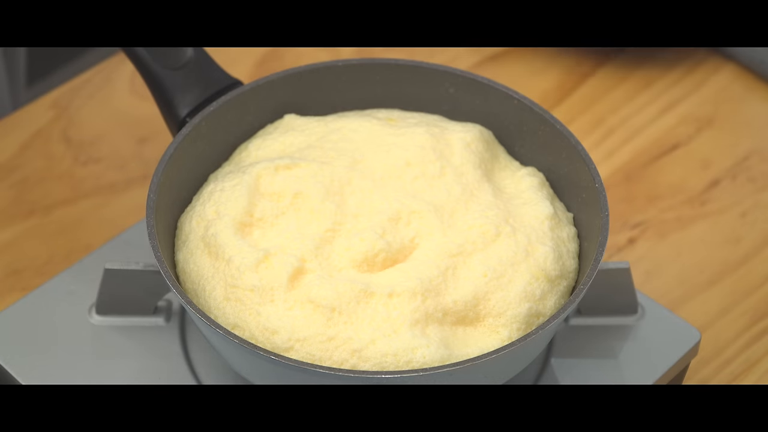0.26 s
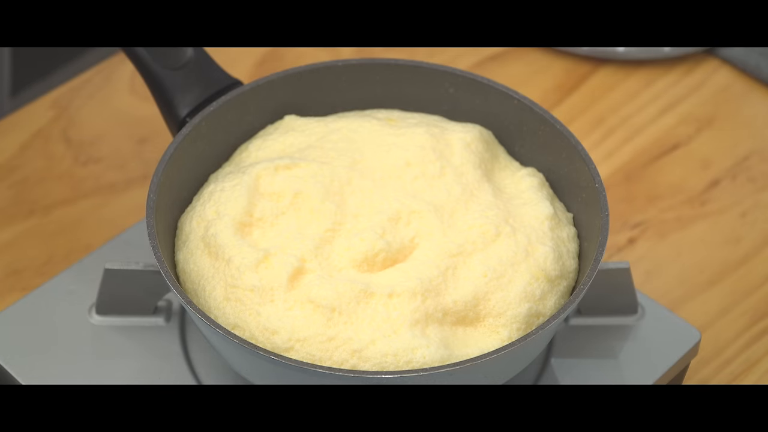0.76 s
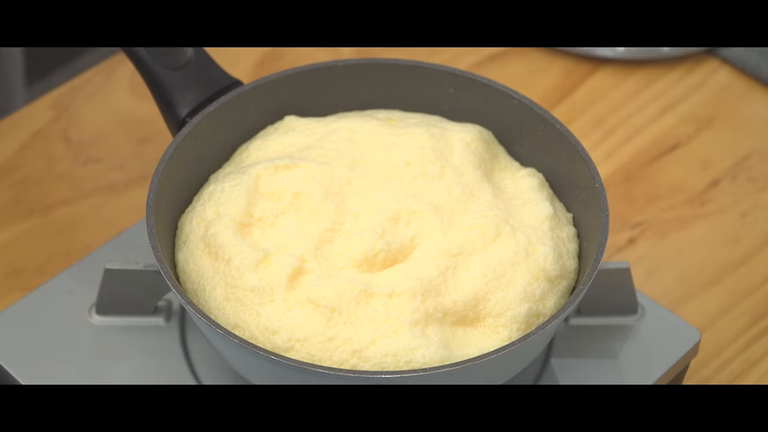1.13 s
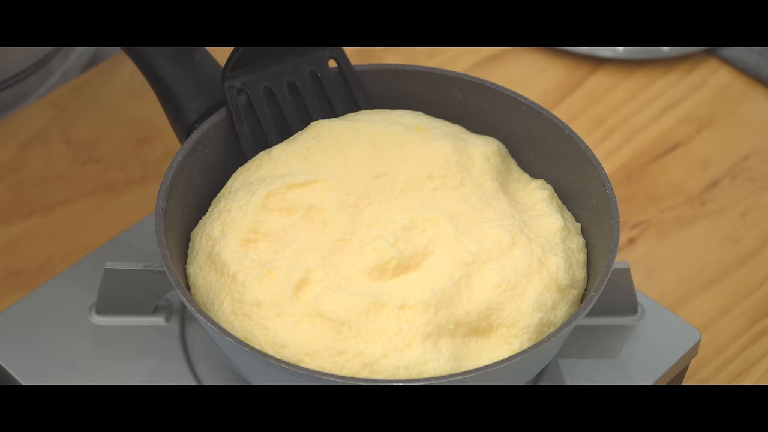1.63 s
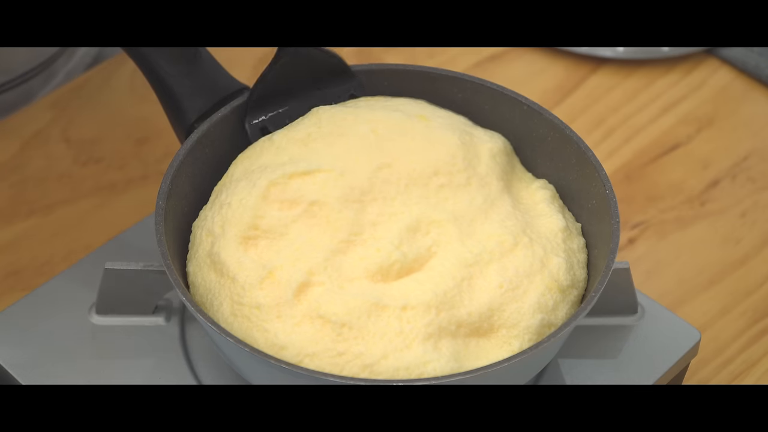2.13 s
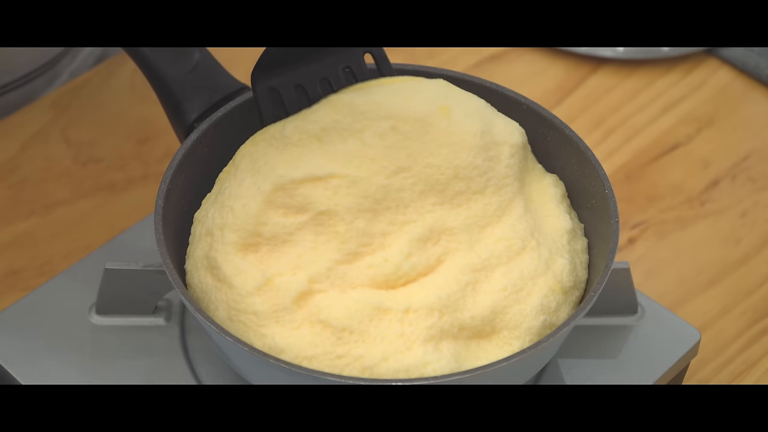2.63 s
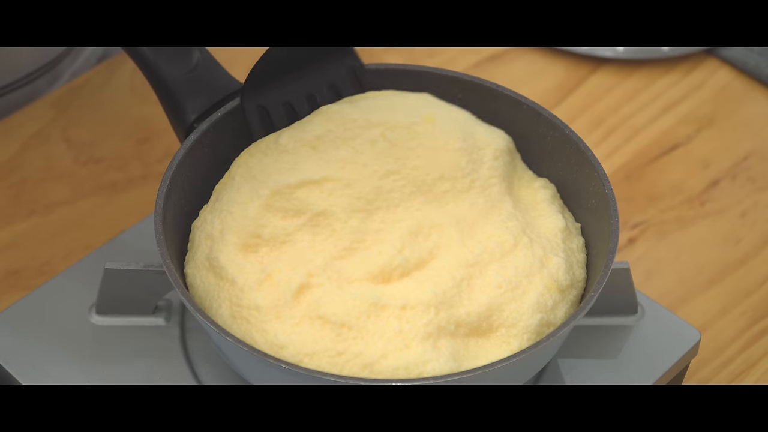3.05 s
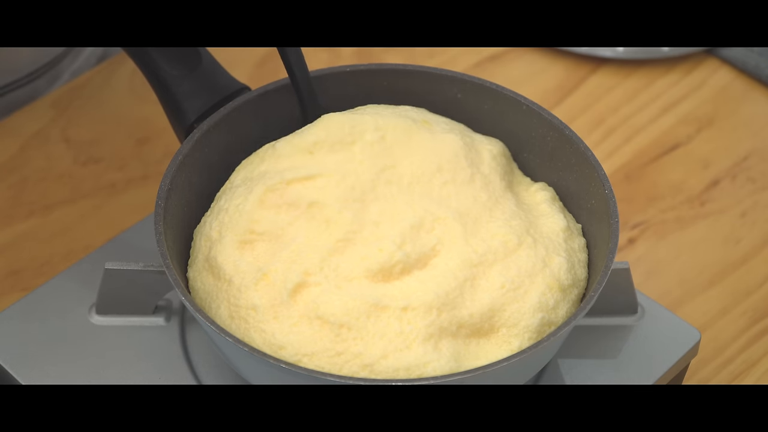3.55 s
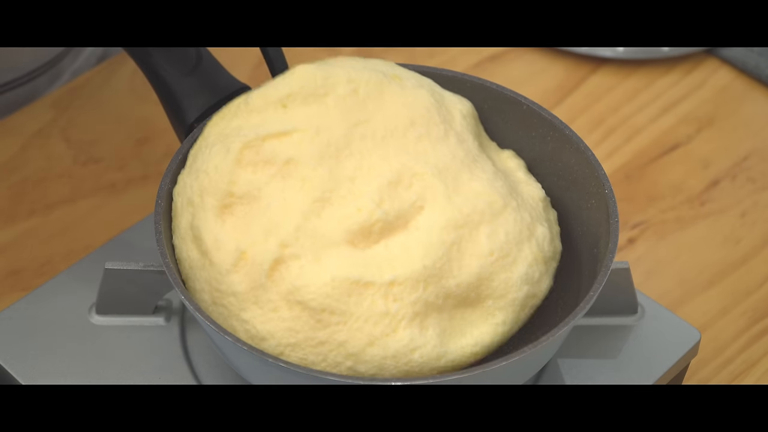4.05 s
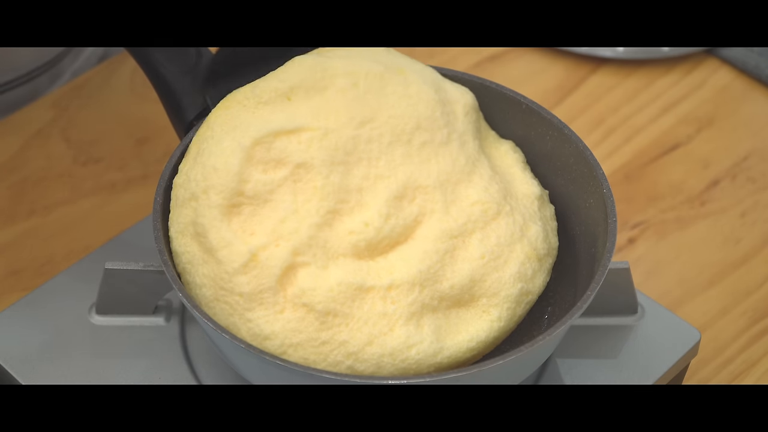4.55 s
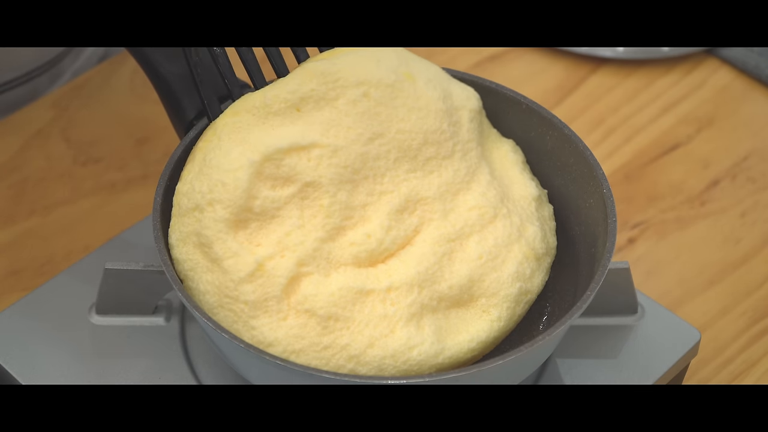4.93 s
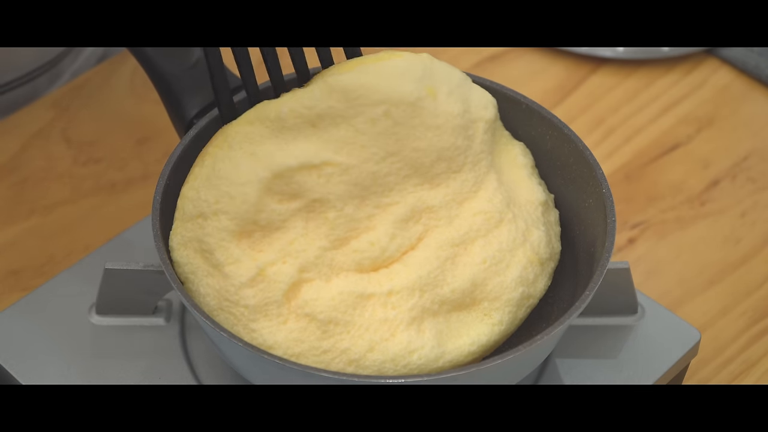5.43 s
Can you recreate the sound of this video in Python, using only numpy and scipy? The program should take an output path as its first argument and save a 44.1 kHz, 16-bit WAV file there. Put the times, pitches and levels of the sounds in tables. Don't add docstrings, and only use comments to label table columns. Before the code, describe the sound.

Quiet kitchen hum and cricket chirps; one ringing dish clank, then dull pan knocks, soft scraping and crackling as egg crust lets go.

```python
import sys
import numpy as np
from scipy import signal
from scipy.fft import rfft, irfft
from scipy.io import wavfile
from scipy.ndimage import uniform_filter1d

SR = 44100
rng = np.random.default_rng(int(sys.argv[2]) if len(sys.argv) > 2 else 0)


def to_wav(s):
    ch = np.atleast_2d(s).T
    pcm = np.round(np.clip(ch, -1, 1) * 32767)
    wavfile.write(sys.argv[1], SR, pcm.astype(np.int16))


def ratio_of_db(decibels):
    return 10 ** (np.asarray(decibels, float) / 20)


N = 251037

# pitch_hz, density_db (per Hz)
HISS_SPECTRUM = [(25, -28.5), (55, -9), (110, -5.5), (370, -18), (1500, -23), (2500, -23.5), (4000, -25),
                 (4600, -26.5), (5500, -19), (6300, -34.5), (11000, -35), (16000, -39)]
# pitch_hz, width_hz, level_db
FAN_RESONANCES = [(1900, 33, -78), (2534, 220, -70.5), (3120, 62, -76.5), (3294, 110, -72.5),
                  (3930, 230, -73), (9000, 130, -99), (11530, 104, -83.5), (12530, 150, -83.5),
                  (13200, 110, -82)]
# time_s, pitch_hz, level_db
MAINS_HUM = [(0, 101.1, -61.5), (.56, 101, -60), (.62, 100.6, -66), (.94, 100.5, -56), (.98, 99.8, -62.5),
             (1.32, 99.7, -64.5), (1.36, 100, -50.5), (2.5, 100.4, -54), (3.5, 95.2, -58.5),
             (4.5, 97.6, -63.5), (5.69, 99.2, -71.5)]
# start_s, length_s
CHIRPS = [(-.12, 0.15), (0.138, 0.15), (0.433, 0.14), (0.706, 0.15), (0.987, 0.23), (1.227, 0.22),
          (1.484, 0.17), (1.74, .15), (2.056, 0.14), (2.331, 0.14), (2.633, 0.16), (2.9, 0.19),
          (3.162, .15), (3.41, .14), (3.714, .14), (3.999, .15), (4.283, 0.15), (4.57, 0.19), (4.892, 0.1),
          (5.145, .12), (5.426, .11), (5.684, .1)]
# time_s, peak_db
DISH_BLOWS = [
    (0.6857, -22.5),
    (.7122, -24.5),
    (0.7167, -37.5),
    (0.7257, -29.5),
    (0.7334, -34.5),
]
# pitch_hz, level_db, t60_s
DISH_MODES = [(78, -14.5, 0.37), (181, -11, 0.28), (292, -13, 0.13), (417, -15, 0.37), (531.5, -7, 0.27),
              (556, -15, .2), (625, -7, 0.44), (733, -21.5, 0.52), (794, -8.5, 0.25), (890, -13, .2),
              (1023, -11, 0.59), (1042, -27, 0.39), (1300, -13, .2), (1417, -17, 0.52), (1450, -3.5, 0.1),
              (1780, -25, 0.25), (1762, -13, 0.5), (1810, -33, 0.47), (2020, -10, 0.19), (2268, -18, 0.55),
              (2565, -28, 0.26), (2844, -19, 0.55), (3400, -31, .3), (4370, -31.5, 0.27), (4760, -37, 0.18),
              (6430, -32, 0.09), (6540, -36, 0.33), (7500, -31.5, 0.1)]
# pitch_hz, level_db, t60_s
TABLE_MODES = [(593, 6, 0.038), (863, 6.5, 0.023), (1322, 7.5, 0.048), (1745, 14.5, 0.025),
               (2290, 2.5, 0.023), (3900, -15.5, 0.028)]
# time_s, gain_db
CLANK_DIP = [(0, 0.5), (.575, -0.5), (.6, -9), (.951, -8), (.957, -0.5), (6, 0)]
# time_s, sway_db, rumble_db
SHOVES = [(.69, -47, -94.5), (1.33, -40.5, -60.5), (1.7, -46.5, -53), (1.94, -43, -52), (2.1, -50.5, -49.5),
          (3.17, -50, -53), (3.3, -49, -51), (3.43, -51.5, -48.5), (4.15, -61, -55), (4.35, -52.5, -54.5),
          (5.2, -77, -69)]
# start_s, hold_s, scrape_db, crackle_db
BLADE_STROKES = [(1.353, 0.039, -57, -71), (1.84, 0.28, -60.5, -88), (2.115, 0.18, -60, -73),
                 (2.43, 0.041, -61, -62.5), (2.548, 0.4, -63.5, -65), (3.164, 0.037, -74, -61),
                 (3.29, 0.029, -53, -76), (3.376, 0.077, -52, -49), (3.493, 0.059, -63, -48),
                 (3.551, 0.026, -59.5, -57), (3.68, 0.051, -59, -51.5), (3.728, .11, -70, -60),
                 (3.88, 0.049, -56, -61.5), (3.99, .13, -67, -64.5), (4.175, 0.041, -60, -80),
                 (4.55, .03, -61, -66), (5.071, 0.039, -67, -64), (5.58, 0.13, -68, -69)]
# pitch_hz, density_db (per Hz)
SCRAPE_SPECTRUM = [(500, 6), (1000, 7.5), (2000, 6), (3200, 0.5), (6000, -9)]
KNOCK_EDGES_HZ = [120, 550, 1500, 2900, 6000, 12000]
# time_s, thump_db, 1khz_db, 2khz_db, 4khz_db
RIM_TAP = [
    (1.3285, -27.5, -32, -29, -31),
]
# time_s, thump_db, 1khz_db, 2khz_db, 4khz_db
PAN_KNOCKS = [(1.679, -41, -49, -49, -72), (1.696, -32.5, -25.5, -30, -28), (1.731, -39, -43.5, -48, -68),
              (1.826, -44, -41, -47.5, -49.5), (1.937, -27.5, -28.5, -29.5, -29),
              (2.090, -28.5, -24, -25.5, -30.5), (2.21, -51, -51, -62, -65), (2.487, -50.5, -54, -59, -54),
              (3.2698, -25, -22.5, -22, -29.5), (3.368, -58, -42, -59, -45), (3.488, -50, -44, -43.5, -57),
              (3.670, -61, -49, -42.5, -47), (3.955, -68, -68, -54, -45.5), (3.868, -45, -49, -51, -56),
              (5.063, -67, -52, -55, -54), (5.102, -56, -50, -49.5, -47)]
# time_s, thump_db, 1khz_db, 2khz_db, 4khz_db
FLOOR_THUDS = [
    (3.066, -43.5, -70, -49.5, -60),
    (3.1632, -19, -26, -29.5, -43.5),
    (4.06, -43, -63, -53, -53),
    (4.267, -45.5, -71, -71, -70),
    (4.339, -13.5, -28.5, -19.5, -37),
    (4.4168, -19.5, -33, -50, -45.5),
    (5.19, -49.5, -64, -68, -68),
]
# pitch_hz, level_db (within its band), t60_s
RIM_MODES = [(139.5, -6, 0.13), (424.5, -24, 0.14), (785, 0.5, 0.09), (890, -6, 0.071), (1360, 9.5, 0.022),
             (1873, 3, 0.027), (2130, -13, 0.05), (2690, -10.5, 0.11), (3330, 6.5, 0.0096),
             (3640, -10, 0.069), (3470, -14, 0.18), (4640, -6, 0.073), (6230, 2, .04)]
# pitch_hz, level_db (within its band), t60_s
PAN_MODES = [(159.4, 1, 0.061), (230, 3, 0.038), (357, -0.5, 0.11), (418, -3.5, 0.079), (790, -14, 0.083),
             (1050, -11.5, 0.15), (1422, 7.5, 0.013), (1890, -1, 0.03), (1970, -13.5, 0.046),
             (2053, -5, 0.071), (2460, -1.5, 0.044), (3170, -8.5, 0.058), (3800, -2, 0.021),
             (4590, -5, 0.076), (5070, -3, 0.019), (5610, 0.5, 0.042), (7030, 3, 0.0096), (8000, 0, 0.012),
             (8430, -2.5, 0.011), (8494, -1, 0.043)]
# pitch_hz, level_db (within its band), t60_s
FLOOR_MODES = [(139, -8.5, 0.031), (264, 0.5, 0.039), (817, -4, 0.033), (1034, -10, 0.23),
               (1050, -11.5, 0.13), (1104, -10.5, 0.1), (1420, 0.5, 0.02), (1943, -0.5, 0.029),
               (2220, -25, 0.027), (3060, -2, 0.023), (4040, -1, 0.047), (5140, -10, 0.036),
               (8500, -2, .03)]
# time_s, peak_db
SINGLE_POPS = [(1.398, -43), (1.536, -43), (2.2605, -24), (2.3566, -38), (2.3858, -40), (2.43, -38),
               (2.4497, -31.5), (2.5675, -39.5), (2.9754, -44), (3.184, -25.5), (3.305, -38), (3.4508, -42),
               (3.5938, -32), (3.6294, -42), (3.7505, -26), (3.7637, -32), (3.8214, -29.5), (3.838, -28.5),
               (4.121, -39), (4.295, -41), (4.3636, -36), (4.458, -40), (4.8683, -38), (4.91, -35.5),
               (5.1031, -32.5), (5.165, -37.5), (5.3071, -42), (5.368, -40.5), (5.4488, -40), (5.649, -35)]
# start_s, length_s, mean_gap_s, strongest_db
TEARS = [(2.275, .008, 0.0047, -34), (2.7003, .025, .01, -38), (2.784, 0.085, 0.013, -36.5),
         (2.888, 0.067, .012, -36), (3.2087, .012, 0.0043, -27.5), (3.3826, 0.008, 0.0016, -21),
         (3.3966, 0.0026, 0.0013, -21.5), (3.4026, .028, .0045, -25), (3.492, .014, .003, -32),
         (3.507, .025, .0025, -24.5), (3.545, 0.042, .0035, -37), (3.6705, 0.035, 0.0036, -26),
         (3.7144, .017, .004, -29), (3.902, .07, 0.013, -49), (3.433, 0.045, .006, -44),
         (3.765, .012, 0.0034, -38), (2.451, .05, 0.019, -43), (3.197, .01, 0.0036, -47),
         (3.79, .012, .004, -33), (5.0736, .002, 0.0089, -37), (5.017, .002, .01, -47),
         (5.5383, 0.048, 0.014, -41.5)]
# time_s, pitch_hz, ring_cycles, low_part_db
CRUST_TONE = [(2.26, 7800, 2.6, -6), (2.9, 8840, 1.6, -9.5), (3.2, 12000, 2, -14), (3.4, 8800, 3, -20.5),
              (3.55, 9500, 8.6, -11), (3.7, 9700, 10, -16.5), (4.1, 10060, 2.7, -8), (4.9, 8700, 3.4, -1.5),
              (5.6, 10300, 3.4, -8.5)]
# time_s, pitch_hz, peak_db
TABLE_BUMPS = [
    (4.058, 45, -48),
    (4.98, 65.8, -48),
    (5.191, 70, -46),
    (5.231, 60.7, -54),
]


def rms_one(x):
    return x / np.sqrt(np.mean(x ** 2) + 1e-20)


def in_time(rows):
    s, *columns = np.transpose(rows)
    return [np.interp(np.arange(N) / SR, s, c) for c in columns]


def band(x, low_hz, high_hz):
    return signal.sosfilt(signal.butter(2, [low_hz, high_hz], "band", fs=SR, output="sos"), x)


def coloured(spectrum):
    hz, db = np.transpose(spectrum)
    axis = np.arange(1, N // 2 + 2) * SR / N
    gain = ratio_of_db(np.interp(np.log(axis), np.log(hz), db))
    return rms_one(irfft(rfft(rng.standard_normal(N)) * gain, N))


def drift(rate_hz):
    knots = rng.standard_normal(500)
    return np.interp(np.arange(N) / SR * rate_hz, np.arange(500), knots) * 1.2


def ring(clicks, hz, t60):
    radius = ratio_of_db(-60 / (max(t60, .0005) * SR))
    w = 2 * np.pi * hz / SR
    return signal.lfilter([0, np.sin(w)], [1, -2 * radius * np.cos(w), radius * radius], clicks + 1e-18)


def train(times, sizes):
    out = np.zeros(N)
    np.add.at(out, np.round(np.asarray(times) * SR).astype(int), sizes)
    return out


def dying(clicks, t60):
    return signal.lfilter([1], [1, -ratio_of_db(-60 / (t60 * SR))], clicks + 1e-18)


def struck(times, sizes, hz, t60, echo_db, echo_t60):
    echoes = ratio_of_db(echo_db) * dying(train(times, np.abs(sizes)), echo_t60) * rng.standard_normal(N)
    even_power = np.sqrt(2 * np.log(1000) / (t60 * SR))
    return ring(train(times, sizes) + echoes * even_power, hz, t60)


def gestures(start, hold, db, rise, fall, rest_db):
    t = np.arange(0, N, 32) / SR
    age = t - start[:, None]
    level = db[:, None] + rise * np.minimum(age, 0) - fall * np.maximum(age - hold[:, None], 0)
    rest_on = t > 1.33
    power = np.sum(ratio_of_db(2 * level), axis=0) + ratio_of_db(2 * rest_db) * rest_on + 1e-14
    return np.interp(np.arange(N) / SR, t, 10 * np.log10(power))


def room_hiss():
    out = ratio_of_db(-60 + .8 * drift(8)) * coloured(HISS_SPECTRUM)
    white = rng.standard_normal(N)
    for hz, width_hz, db in FAN_RESONANCES:
        out += ratio_of_db(db) * rms_one(ring(white, hz, 3.0 / width_hz))
    return out


def hum():
    hz, db = in_time(MAINS_HUM)
    phase = 2 * np.pi * np.cumsum(hz) / SR
    return np.sqrt(2) * ratio_of_db(db + 0.76 * drift(33)) * np.sin(phase)


def cricket():
    t = np.arange(N) / SR
    chirp_levels = []
    for start, length in CHIRPS:
        level = ratio_of_db(-64.5 + 2 * (start < .6))
        chirp_levels.append(level * ((t > start) & (t < start + length)))
    chirps = np.max(chirp_levels, axis=0)
    fade = ratio_of_db(-60 / (.35 * SR))
    echoes = signal.lfilter([0.1 * (1 - fade)], [1, -fade], chirps)
    chirps = 0.71 * uniform_filter1d(chirps, size=300) + echoes + ratio_of_db(-78.5)
    phase = 2 * np.pi * np.cumsum(94 + 4.17 * drift(20)) / SR
    strokes = (0.42 + (.5 + .5 * np.cos(phase)) ** 2.0) * ratio_of_db(1.05 * drift(40))
    wing = band(band(rng.standard_normal(N) * strokes, 5340, 5720), 5240, 5760)
    return chirps * rms_one(wing)


def dish():
    s, db = np.transpose(DISH_BLOWS)
    modes = DISH_MODES + TABLE_MODES
    chance = rng.standard_normal((len(s), len(modes)))
    low, high = np.zeros(N), np.zeros(N)
    for (hz, mode_db, t60), c in zip(modes, chance.T):
        sizes = ratio_of_db(db + mode_db + 2.5 + 2.75 * c) * np.sign(c)
        part = low if hz < 2500 else high
        part += struck(s, sizes, hz, t60, echo_db=-29.0, echo_t60=0.39)
    soft_low = band(band(low, 40, 5000), 30, 5900)
    tail = ratio_of_db(-6.5) * dying(train(s, ratio_of_db(db)), 0.65) * rng.standard_normal(N)
    return high + soft_low + band(band(tail, 135, 1700), 100, 3500)


def crackle(level_db):
    sizes = ratio_of_db(3.5 * np.minimum(rng.exponential(1, N), 4)) * rng.choice([-1, 1], N)
    born = rng.random(N) < 800 * ratio_of_db(4.0 * drift(70)) / SR
    grains = rms_one(band(sizes * born, 3000, 15500))
    grains = grains + ratio_of_db(-18) * rms_one(band(rng.standard_normal(N), 3100, 13000))
    return ratio_of_db(level_db) * rms_one(grains + ratio_of_db(-24.0) * ring(grains, 8970, 0.0029))


def turner():
    start, hold, scrape_db, crackle_db = np.transpose(BLADE_STROKES)
    scrape_db = gestures(start, hold, scrape_db, rise=1200, fall=131, rest_db=-67)
    crackle_db = gestures(start, hold, crackle_db, rise=1200, fall=156, rest_db=-74.5)
    s, sway_db, rumble_db = np.transpose(SHOVES)
    sway_db = gestures(s, 0 * s, sway_db, rise=503, fall=43, rest_db=-70)
    rumble_db = gestures(s, 0 * s, rumble_db, rise=503, fall=39, rest_db=-66)
    rumble = rms_one(band(rng.standard_normal(N), 124, 300)) * ratio_of_db(rumble_db + 2.56 * drift(22.07))
    scrape = coloured(SCRAPE_SPECTRUM) * ratio_of_db(scrape_db + 1.6 * drift(40))
    sway = rms_one(band(band(rng.standard_normal(N), 23, 80), 32, 75)) * ratio_of_db(sway_db - 2.0)
    return rumble + scrape + sway + crackle(crackle_db)


def knocks(rows, modes, ring_db, crack_db, echo_db, tail_db, tail_t60, top_db):
    rows, parts = np.array(rows), np.zeros((5, N))
    top = rows[:, 4] + top_db + 0.51 * np.minimum(rows[:, 4] + 19, 0)
    rows = np.c_[rows, top]
    s = rows[:, 0]
    chance = rng.standard_normal((len(rows), len(modes)))
    for (hz, mode_db, t60), c in zip(modes, chance.T):
        k = np.searchsorted(KNOCK_EDGES_HZ, hz)
        sizes = ratio_of_db(rows[:, k] + mode_db + ring_db + 1.5 * c) * np.sign(c)
        parts[k - 1] += struck(s, sizes, hz, t60, echo_db - 3.4 * k, tail_t60)
    out = 0
    for k, (low, high) in enumerate(zip(KNOCK_EDGES_HZ, KNOCK_EDGES_HZ[1:])):
        hits = train(s, ratio_of_db(rows[:, k + 1]))
        crack = ratio_of_db(crack_db) * dying(hits, 0.048 * 0.73 ** k)
        tail = ratio_of_db(tail_db) * dying(hits, tail_t60 * 0.73 ** k)
        noise = rng.standard_normal(N) * np.sqrt(SR / 2 / (high - low))
        out = out + band(parts[k] + noise * (crack + tail), low * 0.91, high / 1.094)
    return out


def pop_times():
    start, length, gap, db = np.array(TEARS).T[:, :, None]
    draw = rng.exponential(1, (len(TEARS), 2, 20))
    gaps = .6 + .4 * draw[:, 0]
    age = gap * (np.cumsum(gaps, axis=1) - gaps[:, :1])
    level = db - 0.5 * age / length - 1.5 * draw[:, 1] * (age > 0)
    level = level - 200 * (age > length)
    s, single_db = np.transpose(SINGLE_POPS)
    run_s = np.minimum(start + age, N / SR - .01)
    return np.r_[s, run_s.ravel()], np.r_[single_db, level.ravel()]


def pops():
    s, db = pop_times()
    hz, cycles, low_db = [np.interp(s, np.array(CRUST_TONE)[:, 0], c) for c in np.transpose(CRUST_TONE)[1:]]
    draw = rng.standard_normal((len(s), 3))
    hz = np.clip(hz * np.exp(0.08 * draw[:, 0]), 5000, 14500)
    t = np.arange(128) / SR
    age = t * (hz / cycles)[:, None]
    swell_and_die = ratio_of_db(-60 * age) * (1 - np.exp(-age / 0.19)) * 1.87
    high = np.sin(2 * np.pi * hz[:, None] * t) * swell_and_die
    low = np.sin(2 * np.pi * 3600 * t) * ratio_of_db(-60 * t / .0012)
    low = low * ratio_of_db(low_db + 2.5 * draw[:, 1])[:, None]
    sizes = np.sign(draw[:, 2]) * ratio_of_db(db + 7)
    out = np.zeros(N + 128)
    at = np.round(s * SR).astype(int)[:, None] + np.arange(128) - 3
    np.add.at(out, at, (high + low) * sizes[:, None])
    sizzle = dying(train(s, ratio_of_db(db - 19)), 0.006) * rms_one(band(rng.standard_normal(N), 6000, 12000))
    return band(out[:N], 1550, 21000) + sizzle


def bumps():
    rings = [ring(train([s], ratio_of_db(db)), hz, 0.16) for s, hz, db in TABLE_BUMPS]
    return band(sum(rings), 30, 140)


def scene():
    background = room_hiss() + hum() + cricket()
    metal = dish()
    metal += knocks(RIM_TAP, RIM_MODES, ring_db=1.0, crack_db=-8.5, echo_db=-13.0,
                    tail_db=-16, tail_t60=0.4, top_db=-29)
    metal += knocks(PAN_KNOCKS, PAN_MODES, ring_db=-4.0, crack_db=-7, echo_db=-14.0,
                    tail_db=-24.5, tail_t60=0.38, top_db=6.0)
    metal += knocks(FLOOR_THUDS, FLOOR_MODES, ring_db=-1.5, crack_db=-12.0, echo_db=-15.5,
                    tail_db=-32.5, tail_t60=0.29, top_db=-4)
    return (background + metal + turner() + pops() + bumps())[None]


def low_pass(x):
    return signal.sosfilt(signal.butter(12, 16520, fs=SR, output="sos"), x)


def record(dry):
    dipped = dry * ratio_of_db(in_time(CLANK_DIP)[0])
    top_cut = signal.ellip(8, .5, 32, 15750, fs=SR, output="sos")
    return low_pass(signal.sosfilt(top_cut, dipped))


dry = scene()
out = record(dry)
to_wav(out)
```